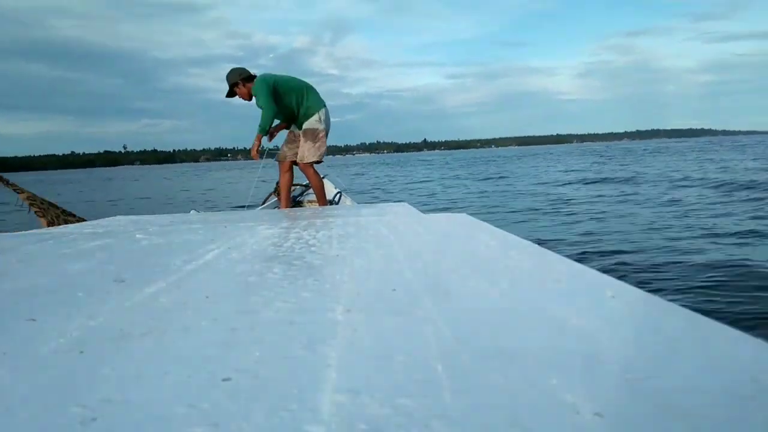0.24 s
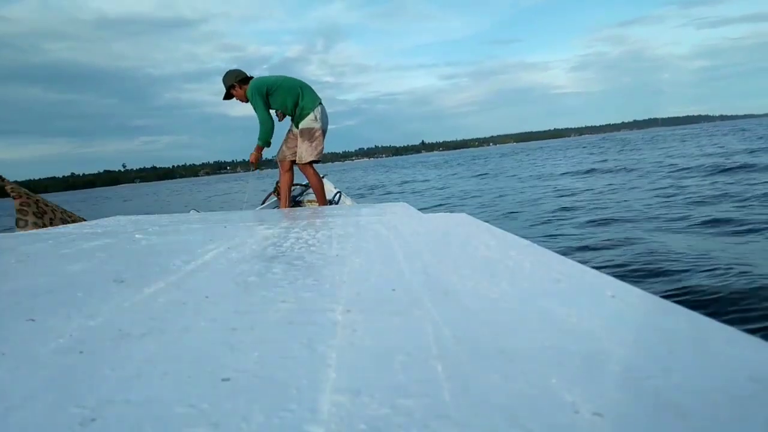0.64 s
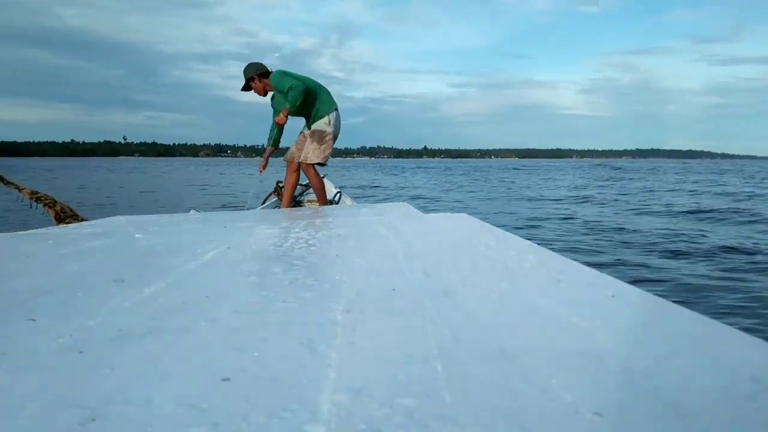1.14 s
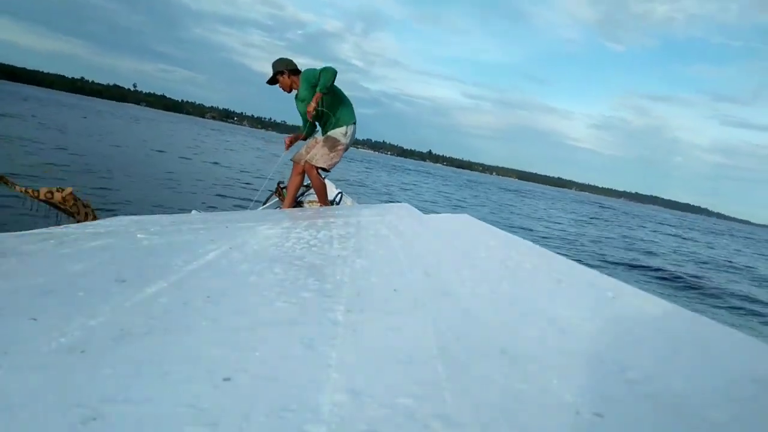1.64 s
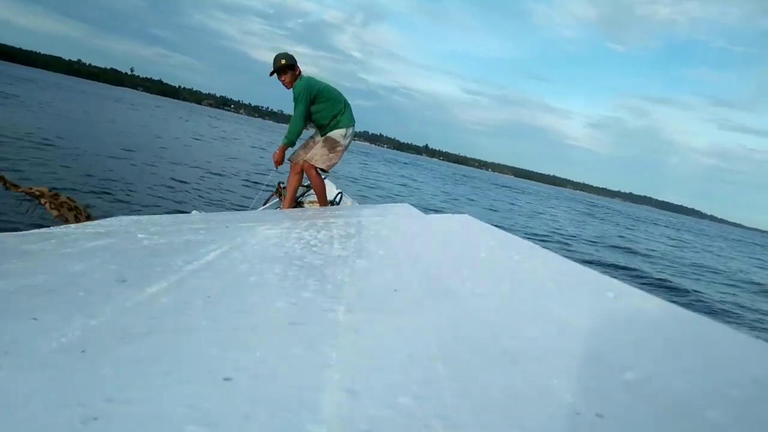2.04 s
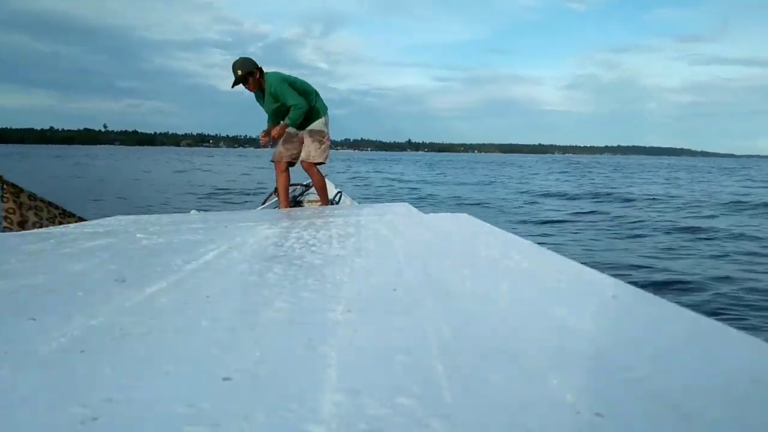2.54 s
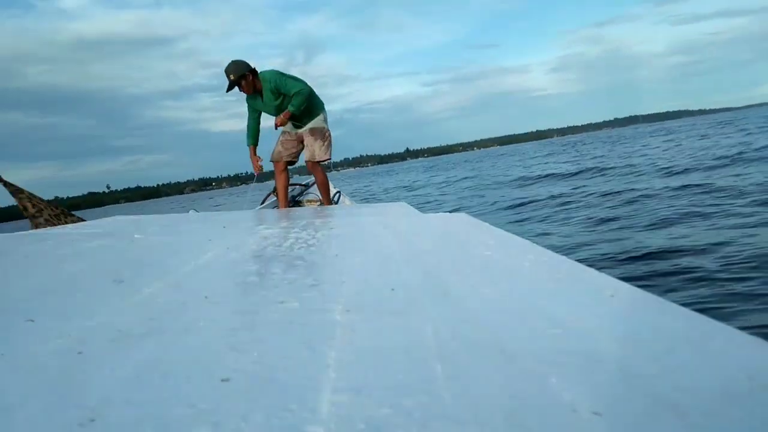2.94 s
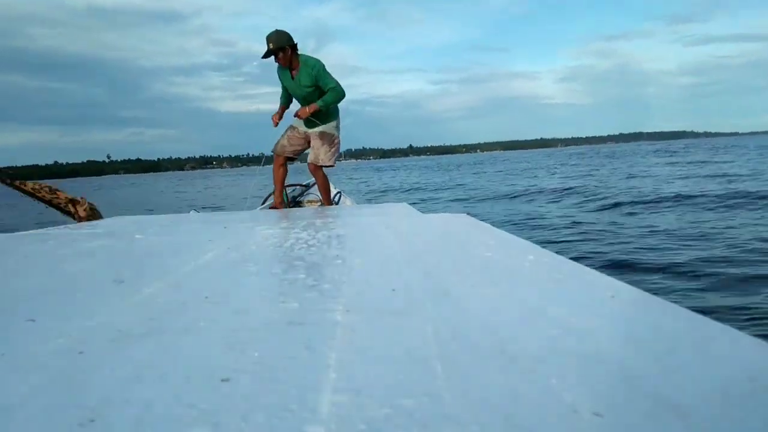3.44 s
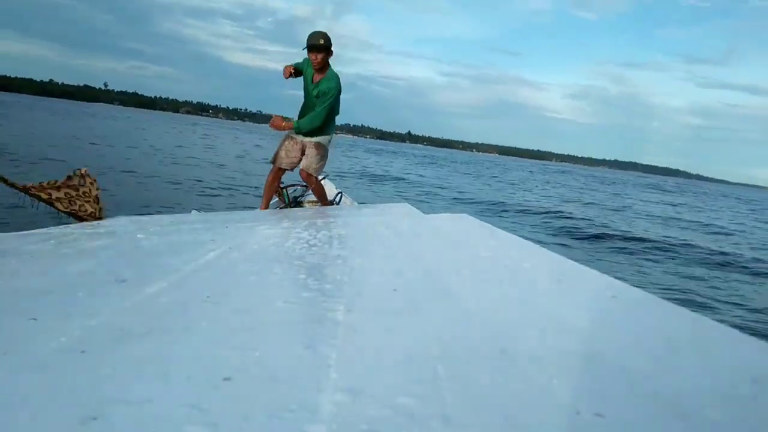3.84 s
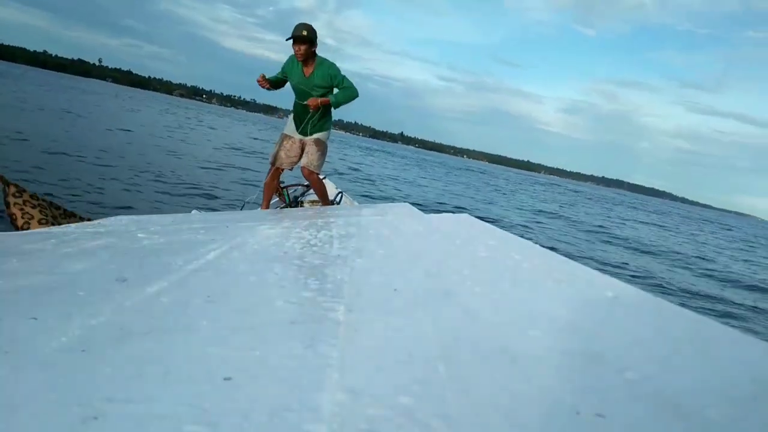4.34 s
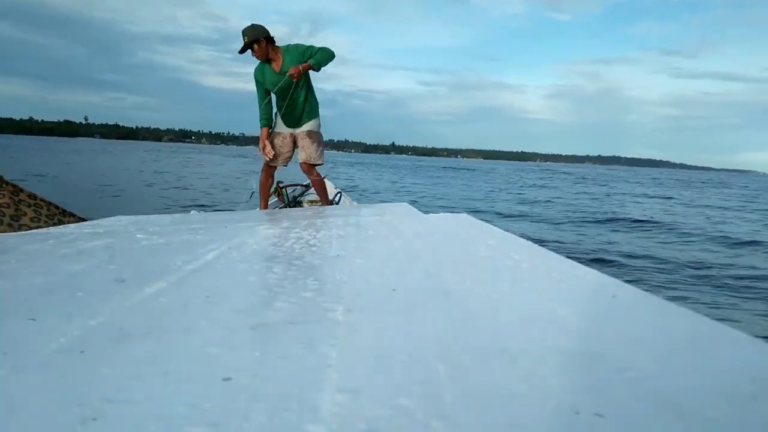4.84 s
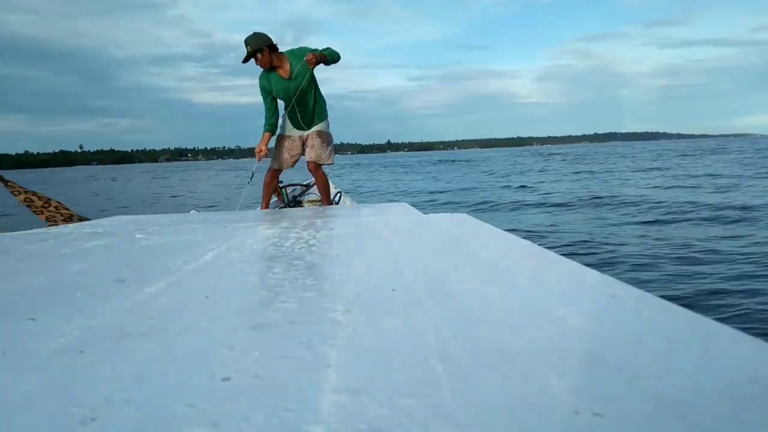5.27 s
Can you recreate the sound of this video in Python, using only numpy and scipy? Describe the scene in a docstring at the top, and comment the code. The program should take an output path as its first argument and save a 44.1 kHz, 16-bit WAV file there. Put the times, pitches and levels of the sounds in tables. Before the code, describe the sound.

Heard from the deck of a small boat on open water, uneven splashes gurgle against the hull over a low wind rumble. Small drips tick and a taut line rubs with a hiss as it is pulled in. Midway the line gives short, high squeaks and a rasping chatter, and the water grows busier, with sharp slaps, thuds and hollow gulps. The line squeaks once more near the end.

```python
"""Low, lumpy wind on the microphone and water sloshing along a hull: a small boat on open water, from on deck.
The sloshing is a rush of noise full of ringing bubbles. Short blips ring, drops tick, waves bump and slap
the boat, and air trapped under the hull gulps. A line is hauled in by hand: something taut hisses as it
rubs and, from about halfway, squeaks and chatters. One microphone picks it all up, through a bass cut
and a noise suppressor, over faint circuit hiss."""
import sys
import numpy as np
from scipy import signal
from scipy.io import wavfile
from scipy.ndimage import uniform_filter1d

SR = 44100
rng = np.random.default_rng(int(sys.argv[2]) if len(sys.argv) > 2 else 0)


def output_pcm(signal):
    """Save a mono or channel-first signal as 16-bit PCM at the path in sys.argv[1].

    Samples are clipped to [-1, 1] before scaling.
    """
    pcm = np.clip(np.atleast_2d(signal).T, -1, 1) * 32767
    wavfile.write(sys.argv[1], SR, np.round(pcm).astype(np.int16))


N = 242856


def gain_of(db):
    """Decibels to amplitude."""
    return 10 ** (np.asarray(db) / 20)


def unit_rms(x):
    """Scales to rms 1."""
    return x / np.sqrt(np.mean(x ** 2) + 1e-20)


def steadied(x, window_s):
    """Evens out drifts of level slower than window_s; rms 1."""
    return unit_rms(x / np.sqrt(uniform_filter1d(x ** 2, round(window_s * SR)) + 0.046))


def add(mix, start_s, sound):
    """Mixes a sound in at start_s."""
    part = mix[round(start_s * SR):][:len(sound)]
    part += sound[:len(part)]


def spectrum_db(points, hz):
    """Level of a spectrum at hz, interpolated over log frequency."""
    point_hz, db = np.transpose(points)
    return np.interp(np.log(hz + 1), np.log(point_hz + 1), db)


def resonate(x, hz, width_hz):
    """A resonance of gain 1 that can glide: shifts hz down to zero, smooths, and shifts back."""
    carrier = np.exp(2j * np.pi * np.cumsum(hz * np.ones(len(x))) / SR)
    pole = np.exp(-np.pi * width_hz / SR)
    return 2 * (carrier * signal.lfilter([1 - pole], [1, -pole], x / carrier)).real


def band_noise(length, hz, width_hz):
    """Noise passed twice through a resonance; rms 1."""
    return unit_rms(resonate(resonate(rng.standard_normal(length), hz, width_hz), hz, width_hz))


def noise(colour, patchy_db, flicker_db, size=512):
    """Coloured noise with drifting spectral patches and a flicker shared by all frequencies; rms 1."""
    frames, hz = 4 * N // size + 5, np.fft.rfftfreq(size, 1 / SR)
    real, imag, patches = rng.standard_normal((frames, len(hz), 3)).T
    patches = unit_rms(uniform_filter1d(uniform_filter1d(patches, size=3, axis=0), size=14, axis=1))
    flicker = unit_rms(uniform_filter1d(rng.standard_normal(frames), size=3))
    shape_db = spectrum_db([(0, -100)] + colour + [(SR / 2, -100)], hz)
    spectra = (real + 1j * imag) * gain_of(shape_db[:, None] + patchy_db * patches + flicker_db * flicker)
    return unit_rms(signal.istft(spectra, nperseg=size, noverlap=3 * size // 4)[1][:N])


def burst(hz, width_hz, t60, rise_s, tone=0.):
    """A dying puff of band noise with some pure tone in it; peak 1."""
    t = np.arange(round(.4 * SR)) / SR
    ring = band_noise(len(t), hz, width_hz) + tone * np.sin(2 * np.pi * hz * t)
    puff = ring * (1 - np.exp(-t / rise_s)) * gain_of(-60 * t / t60)
    return puff / abs(puff).max()


def wind_and_bumps(gurgle_gain):
    """Wind buffets the microphone; each wave bump adds rumble and a thud, and gurgles shake the hull."""
    # spectra of the rumble and of the thud under the hull: (frequency [Hz], relative density [dB])
    rumble_colour = [(25, -20.5), (42, -42), (56, 4), (80, -3), (110, -8.5), (150, -11), (190, -47),
                     (300, -59.5), (500, -72)]
    thud_colour = [(90, -18.5), (130, 5), (190, 7), (240, -3), (310, -3), (420, -13.5)]
    # wind on the microphone: (time [s], level [dB])
    wind_levels = [(0.0, -44.5), (0.31, -58), (0.75, -46), (1.13, -55), (1.64, -44.5), (2.57, -52),
                   (2.66, -50), (2.91, -50.5), (3.4, -46), (3.92, -45.5), (4.07, -36), (4.26, -46),
                   (5.27, -49.5), (5.5, -49)]
    # waves bumping the boat: (time [s], half length [s], rumble [dB], thud [dB])
    bumps = [(0.317, 0.041, -36, -77), (0.427, 0.036, -34, -73), (0.577, 0.064, -40, -83),
             (0.691, 0.13, -50, -73), (0.876, 0.052, -60, -45.5), (1.04, 0.01942, -56.5, -78.5),
             (1.555, 0.11, -44, -60.5), (1.846, 0.069, -40, -51), (2.01, 0.078, -39.5, -62.5),
             (2.174, 0.04686, -40.5, -58.5), (2.321, 0.065, -40.5, -47), (2.443, 0.0603, -41, -54),
             (2.585, 0.0769, -45, -36.5), (3.152, 0.0271, -45, -76), (3.25, 0.059, -36.5, -48),
             (3.448, 0.026, -51, -46), (3.577, .15, -42, -46.5), (3.951, 0.059, -32.5, -34.5),
             (4.109, 0.045, -34, -44.5), (4.178, 0.092, -52, -39), (4.443, 0.0544, -47, -45),
             (4.543, 0.02013, -35.5, -51), (4.812, 0.16, -69.5, -36), (5.089, 0.0333, -44, -40.5),
             (5.281, 0.029, -36.5, -38.5), (5.34, 0.045, -47, -43), (5.439, 0.039, -51, -40)]
    edge_db, shake_db = -15.5, -12.5  # a bump half a length from its top; thud relative to gurgle
    rumble = steadied(noise(rumble_colour, 3.56, 2.7, size=2048), 0.28)
    thud = steadied(noise(thud_colour, 3.0, 0.5, size=1024), 0.084)
    t = np.arange(N) / SR
    rumble_power = gain_of(np.interp(t, *np.transpose(wind_levels))) ** 2
    thud_power = (gain_of(shake_db) * gurgle_gain) ** 2
    for top_s, half_s, rumble_db, thud_db in bumps:
        lump_db = edge_db * ((t - top_s) / half_s) ** 2
        rumble_power += gain_of(rumble_db + lump_db) ** 2
        thud_power += gain_of(thud_db + lump_db) ** 2
    return np.sqrt(rumble_power) * rumble + np.sqrt(thud_power) * thud


def blips():
    """Short, narrow-band ringing blips and a few brief pitched ticks."""
    # blips: (time [s], peak [dB], pitch [Hz], width [Hz], t60 [s])
    rings = [(0.027, -44.5, 2876, 515, 0.58), (0.087, -56, 6860, 500, 0.151),
             (0.765, -43.5, 2270, 297.5, 0.1359), (1.412, -48, 1838, 199, 0.21),
             (1.555, -56.5, 2698, 151.1, 0.19), (2.115, -48.5, 1065, 395, 0.15),
             (2.745, -40.5, 660, 194, 0.1365), (2.85, -44.5, 2450, 888, 0.04),
             (2.922, -39.5, 1162, 404, 0.27), (2.961, -38, 1015, 295, 0.14), (2.98, -36, 920, 250, 0.093),
             (2.975, -38, 4140, 400, 0.0585), (2.531, -28, 2990, 500, 0.05967),
             (3.586, -37, 3520, 390, 0.037), (4.022, -24.5, 2560, 1283, 0.019),
             (5.173, -45.5, 1510, 250, 0.14)]
    out = np.zeros(N)
    for start_s, db, hz, width_hz, t60 in rings:
        add(out, start_s, gain_of(db) * burst(hz, width_hz, t60, rise_s=0.0084 * t60, tone=0.5652))
    return out


def swell_gains():
    """Swells of sloshing water and of rubbing hiss: a gain curve for each of five bands; powers add."""
    # swells: (start [s], rise [s], time to fall 20 dB at fall speed 1 [s],
    #          gurgle [dB], splash [dB], patter [dB], spray or rubbing hiss [dB], mist [dB])
    swells = [(0.029, 0.11669, 0.54, -60.5, -49.5, -53.5, -59, -95),
              (0.148, 0.12, 0.29, -50.5, -46.5, -49.5, -54, -95),
              (0.51, 0.00233, 0.8, -73.5, -79, -71.5, -60, -95),
              (0.576, 0.009316, 0.23, -58.5, -53.5, -51, -55, -83),
              (0.681, 0.001434, 0.8, -77, -71, -85, -61.5, -73.5),
              (.77, 0.04627, 0.32, -79, -54.5, -61, -59, -88),
              (0.814, 0.04168, .04, -34, -43.5, -45, -44, -64),
              (.86, 0.044, 0.27, -43, -57, -51.5, -50.5, -80),
              (.9, 0.13, 0.0996, -66, -46, -49, -54.5, -90),
              (1.04, 0.074, 0.15, -46.5, -45, -48.5, -52, -71.5),
              (1.14, 0.036, 0.0754, -48, -45, -63, -70, -100),
              (1.21, 0.041, 0.16, -57.5, -57, -62.5, -61.5, -95),
              (1.794, 0.028, 0.15, -56.5, -56, -50.5, -54, -99),
              (2.116, 0.012, 0.7, -59, -58.5, -63.5, -70, -100),
              (2.14, 0.092, 0.82, -51, -51, -49.5, -53, -76),
              (2.25, 0.12, 0.33, -43, -45.5, -51, -58.5, -84.5),
              (2.37, 0.18, 0.13, -39.5, -39.5, -42, -49, -67),
              (2.539, 0.031, 0.07, -32, -36, -43.5, -44, -65),
              (2.703, 0.0031, 0.1144, -52, -49.5, -62.5, -44.5, -66),
              (2.759, 0.1, 0.4, -75, -72, -61.5, -51.5, -77),
              (2.9, 0.02005, 0.46, -86, -54, -64.5, -61, -74), (2.95, 0.04, 0.2, -64.5, -55, -56, -51, -75),
              (3.048, .005, 0.2046, -51, -47.5, -49.5, -54, -71),
              (3.065, 0.0151, 0.2559, -57, -53.5, -52.5, -57, -87),
              (3.163, 0.009, 0.1, -41, -40, -37, -47.5, -63.5),
              (3.236, 0.02063, .06, -48, -61, -59, -65, -90.5),
              (3.294, 0.07776, 0.64, -53, -59, -55.5, -48.5, -72),
              (3.37, 0.064, 0.4501, -45, -47.5, -47, -52.5, -75),
              (3.43, 0.06386, 0.7, -59, -53, -52, -56, -77.5),
              (3.524, 0.024, 0.0668, -41.5, -39.5, -49.5, -40.5, -60),
              (3.56, 0.02561, 0.27, -43.5, -45, -56, -56, -73.5),
              (3.619, 0.07974, 0.1833, -44.5, -43, -46.5, -53, -72),
              (3.859, 0.011, .08, -46, -53, -63, -58.5, -99),
              (3.903, 0.00962, 0.11, -41.5, -42.5, -52.5, -46, -58.5),
              (3.979, 0.026, 1, -70, -60, -60.5, -60, -76),
              (4.136, 0.019, 0.0059, -36.5, -41.5, -55, -46, -89),
              (4.158, 0.022, 0.18, -41.5, -42.5, -42.5, -47, -72),
              (4.25, 0.031, 0.4, -50, -51.5, -62, -68.5, -93),
              (4.42, 0.026, 0.4125, -52.5, -67.5, -63.5, -63.5, -98),
              (4.396, .004, 0.1, -47.5, -53, -71, -63, -88.5),
              (4.528, 0.086, 0.61, -43, -42.5, -44, -45.5, -65),
              (4.619, 0.18683, 0.14, -38.5, -40, -44, -53, -72.5),
              (4.868, 0.024, 0.1944, -42, -43.5, -44.5, -47.5, -68),
              (5.053, .014, 0.05, -34.5, -37, -48.5, -47.5, -55.5),
              (5.099, 0.0056, 0.1302, -56, -54.5, -65.5, -59, -71),
              (5.16, .03, 1.5, -72, -66.5, -70, -68, -95), (2.62, 0.01768, .2, -63, -50, -58, -57.5, -90),
              (.44, 0.0086, .06, -57.5, -63, -67, -73, -89), (.028, 0.028, 0.0726, -70, -62, -57, -68, -95),
              (5.226, 0.0054, .14, -69, -60.5, -60, -49, -64),
              (5.309, 0.0091, 0.3, -59, -54, -54, -68, -75),
              (5.395, 0.026, .08, -46.5, -48, -53.5, -54.5, -65),
              (5.45, 0.026, 2.5, -57.5, -60, -58, -64, -78.5)]
    fall_speeds = (.9, 1.05, 1.4, 1.7, 2.2)  # gurgle to mist: higher bands die sooner
    power = np.zeros((5, N))
    for start_s, rise_s, fall_s, *levels_db in swells:
        t = np.arange(round((rise_s + 4 * fall_s) * SR)) / SR
        rise = np.minimum(t / rise_s, 1) ** 0.98925
        fall_db = 20 * (np.maximum(t - rise_s, 0) / fall_s) ** 1.102
        for band, db, speed in zip(power, levels_db, fall_speeds):
            add(band, start_s, (rise * gain_of(db - speed * fall_db)) ** 2)
    return np.sqrt(power)


def bubbles(low_hz, high_hz, per_s, cycles, spread_db):
    """Scattered bubbles of 16 sizes, each a short ring that rises in pitch; a few are loud."""
    strength = gain_of(spread_db * np.minimum(rng.exponential(1, N), 4))
    onsets = strength * (rng.random(N) < per_s / SR)
    size_class, out = rng.integers(0, 16, N), np.zeros(N)
    for k, hz in enumerate(np.geomspace(low_hz, high_hz, num=16)):
        turns = np.arange(round(3 * cycles * SR / hz)) * hz / SR
        ring = np.exp(-turns / cycles * 2) * np.sin(2 * np.pi * turns * (1 + 0.012 * turns))
        out += signal.oaconvolve(onsets * (size_class == k), ring)[:N]
    return unit_rms(out)


def hull_ring(x):
    """The hollow boat resonates to the water against it."""
    # hull modes: (frequency [Hz], width [Hz], relative gain [dB])
    modes = [(223, 9.7, 11), (371.21, 18, 4.5), (404, 16, 3.5), (622, 165, 7.5), (800, 720, -4),
             (946, 86, 2)]
    return unit_rms(sum(gain_of(db) * resonate(x, hz, width_hz) for hz, width_hz, db in modes))


def slosh(gains):
    """Four bands of rushing noise and bubbles; the lowest rings the hull, the top is also rubbing hiss."""
    # spectra of the four bands, low to high: (frequency [Hz], relative density [dB])
    gurgle_colour = [(200, -13), (300, -10), (400, 11), (700, 5), (1000, -23.5), (1600, -47)]
    splash_colour = [(500, -30), (780, 8), (1100, 4), (1800, 1.5), (2300, -16.5), (3500, -54)]
    patter_colour = [(1300, -17.5), (1900, 2), (2700, 0.5), (3600, -4), (4300, -6.5), (6000, -58)]
    hiss_colour = [(2800, -61), (3800, 9), (5000, 7), (6500, 5), (7500, 7), (8500, 4.5), (10000, -46)]
    gurgle = noise(gurgle_colour, 4.1, 1.86)
    gurgle += .85 * bubbles(314, 755.16, per_s=90, cycles=22.5, spread_db=4.5)
    gurgle = unit_rms(gurgle) + .7 * hull_ring(gurgle)
    splash = noise(splash_colour, 2.5, .7)
    splash += .45 * bubbles(800, 1800, per_s=400, cycles=10.5, spread_db=3)
    patter = noise(patter_colour, 2.5, 1.5)
    patter += .5 * bubbles(1900, 3400, per_s=300, cycles=9, spread_db=4.5)
    hiss = noise(hiss_colour, 2.5, 2.1, size=256)
    hiss += .45 * bubbles(3800, 7000, per_s=500, cycles=14, spread_db=4.5)
    return sum(gain * steadied(x, 0.19) for gain, x in zip(gains, (gurgle, splash, patter, hiss)))


def mist(gain):
    """The finest droplets: a faint top that crackles with the splashes."""
    # spectrum of the droplets: (frequency [Hz], relative density [dB])
    colour = [(7500, -14), (9000, 8.5), (10200, -4), (11500, -3), (13000, -18), (15500, -37)]
    return gain * steadied(noise(colour, patchy_db=3.5, flicker_db=2.5, size=256), 0.028)


def drops():
    """Fine drops strike with a treble tick."""
    # drop strikes: (time [s], peak [dB], pitch [Hz], t60 [s])
    ticks = [(0.2036, -37, 3920, 0.023), (0.5162, -38, 6360, 0.0115), (0.6875, -28, 4667, 0.02),
             (0.7061, -35, 6720, 0.012), (0.849, -30.5, 6250, 0.016), (0.8967, -32.5, 6900, 0.016),
             (0.9331, -37.5, 6837, 0.016), (1.0997, -37, 4390, 0.016), (1.2263, -39, 6561, 0.025),
             (1.6262, -59, 4540, 0.016), (1.8082, -41, 4016, 0.015), (1.919, -50.5, 4851, 0.024),
             (2.2741, -28, 5726, 0.0084), (2.4618, -34.5, 5954, 0.016), (2.482, -30, 3940, 0.016),
             (2.5024, -29, 3740, 0.0107), (2.5308, -25, 3870, 0.012), (2.555, -33, 6140, 0.014),
             (2.585, -34, 4000, 0.00713), (2.6479, -42, 3833, 0.016), (3.0525, -42.5, 4020, 0.0115),
             (3.5373, -31, 3816, 0.035), (3.8576, -43.5, 6220, 0.012), (3.911, -32, 6400, 0.012),
             (3.9384, -36.5, 3880, 0.042), (4.2355, -36.5, 4770, 0.014), (4.411, -65.5, 4448, 0.016),
             (4.7173, -32, 4231, 0.0118), (4.789, -31, 4000, 0.01284), (4.8944, -38, 3807, 0.016),
             (5.0589, -36.5, 4460, 0.01637), (5.1512, -43, 5950, 0.015), (5.2644, -36.5, 4286, 0.0195),
             (5.4426, -37, 5060, 0.019)]
    out = np.zeros(N)
    for start_s, db, hz, t60 in ticks:
        add(out, start_s, gain_of(db) * burst(hz, width_hz=2830, t60=t60, rise_s=0.00038, tone=0.97))
    return out


def slaps():
    """Water slaps the hull: a hollow knock plus a wide crack."""
    # slaps: (time [s], knock peak [dB], pitch [Hz], t60 [s], crack relative to knock [dB])
    impacts = [(0.589, -43.5, 636.6, 0.043, -21), (0.854, -54.5, 640, 0.0657, -8),
               (2.281, -24, 570, 0.06, -32), (2.529, -28, 880, 0.05, 5), (2.569, -51, 425, 0.025, -20.5),
               (3.169, -15.5, 1269, 0.032, 0.5), (3.245, -34.5, 433, 0.2784, -15),
               (3.41, -30, 618.7, 0.34, -32), (3.912, -29.5, 549, 0.165, -9),
               (4.144, -22.5, 890, 0.02673, -43), (4.398, -26.5, 600, 0.07044, -25),
               (4.7, -24, 567, 0.27, -10), (4.789, -23.5, 328, 0.0806, -19),
               (5.058, -47, 575, 0.0338, -3.5)]
    out = np.zeros(N)
    for start_s, db, hz, t60, crack_db in impacts:
        knock = burst(hz, width_hz=0.9788 * hz, t60=t60, rise_s=0.0006, tone=0.77)
        crack = burst(2500, width_hz=11000, t60=0.54 * t60, rise_s=0.00017)
        add(out, start_s, gain_of(db) * (knock + gain_of(crack_db) * crack))
    return out


def gulps():
    """Pockets of air trapped under the hull ring as single tones that slide for their first 0.1 s."""
    # air pockets: (time [s], level [dB], starting pitch [Hz], slide per 50 ms [ratio], t60 [s])
    pockets = [(.853, -29, 540, 1.03, 0.082), (2.561, -25.5, 424.5, 1, 0.19),
               (2.585, -25.5, 800, 0.87, 0.0987), (3.449, -33, 197, 0.75, 0.3),
               (3.92, -23.5, 259.6, 0.94, 0.1442), (3.948, -28, 197, 0.8822, 0.16),
               (4.106, -24, 129, 0.5, 0.046), (4.157, -29.5, 253.4, 0.82, 0.2),
               (4.41, -39.5, 237.2, 0.99, 0.28), (4.70, -28.5, 572.5, 1.03, 0.1766),
               (4.705, -27.5, 404, 0.966, 0.21), (4.801, -19, 356, 0.63, 0.099),
               (4.9, -39.5, 636, 1.296, 0.0778), (5.067, -31, 236, 1.0017, 0.35),
               (5.275, -36.5, 220, 0.76, 0.18), (5.3, -36, 347, 1, 0.072), (5.425, -35, 221.4, 1.28, 0.19)]
    out, t = np.zeros(N), np.arange(round(.3 * SR)) / SR
    for start_s, db, hz, slide, t60 in pockets:
        pitch_hz = hz * slide ** (np.minimum(t, .1) / .05)
        turns = np.cumsum(pitch_hz) / SR + rng.random()
        envelope = gain_of(db - 60 * t / t60) * (1 - np.exp(-t / 0.0069))
        add(out, start_s, envelope * np.sin(2 * np.pi * turns))
    return out


def squeaks():
    """Something taut rubs and squeaks: a rough gliding tone with a weaker overtone."""
    # one list a squeak: (time [s], level [dB], pitch [Hz], noise to tone [ratio], overtone pitch [ratio])
    rubs = [
        [(2.706, -37, 5110, .3, 1.45), (2.711, -35.5, 6160, 0.48, 1.45), (2.722, -43.5, 5970, 0.5285, 1.45),
         (2.733, -41, 5219, 0.678, 1.45), (2.748, -54, 3670, 0.407, 1.45)],
        [(3.008, -81.5, 5404, 0.32, 1.45), (3.016, -51, 4780, 0.57, 1.45), (3.024, -41, 4090, 0.356, 1.45)],
        [(5.23, -42.5, 2810, 0.476, 2.), (5.245, -44, 3050, 0.72, 2.), (5.27, -46, 3160, .9, 2.),
         (5.28, -55, 3020, 0.875, 2.)],
    ]
    out = np.zeros(N)
    for rows in rubs:
        times, *columns = np.transpose(rows)
        t = np.arange(times[0], times[-1], 1 / SR)
        db, pitch_hz, roughness, multiple = (np.interp(t, times, column) for column in columns)
        tone, overtone = (np.sin(2 * np.pi * np.cumsum(hz) / SR) + roughness * band_noise(len(t), hz, 480)
                          for hz in (pitch_hz, multiple * pitch_hz))
        add(out, times[0], gain_of(db) * (tone + 0.26 * overtone) * signal.windows.tukey(len(t), .15))
    return out


def chatter():
    """Runs of regular slips; in each slip the pitch drops from above, holds, and climbs as it dies."""
    # one list a run: (time [s], level [dB], held pitch [Hz], ringing share of a period [ratio],
    #                  upper partial [dB], rasp depth [ratio])
    runs = [
        [(2.77, -50, 3800, .85, -12, .5), (2.82, -47.5, 4100, .75, -7, .5), (2.87, -46, 4650, .6, -5, .5),
         (2.908, -43, 5200, .45, -7, .4)],
        [(2.919, -42, 5200, .33, -8, .3), (2.99, -43, 5100, .33, -8, .3)],
        [(3.2938, -36.5, 5030, .46, -15, .25), (3.42, -37, 4880, .42, -12, .35),
         (3.47, -39, 4720, .35, -12, .35), (3.53, -41, 4400, .4, -16, .4)],
    ]
    # pace of the slipping: (time [s], slips [1/s])
    slip_rates = [(2.77, 220), (2.87, 160), (2.908, 150), (2.919, 95), (2.99, 95), (3.29, 74.4),
                  (3.4, 73.7), (3.53, 73.7)]
    out = np.zeros(N)
    for rows in runs:
        times, *columns = np.transpose(rows)
        t = np.arange(times[0], times[-1], 1 / SR)
        rate = np.interp(t, *np.transpose(slip_rates))
        db, hz, share, upper_db, rasp = (np.interp(t, times, column) for column in columns)
        progress = np.minimum(np.cumsum(rate) / SR % 1 / share, 1)  # every slip starts its ring afresh
        cycles = hz * share / rate
        turns = cycles * (progress + .07 * (1 - np.exp(-progress / .11)) + .11 * progress ** 4.5)
        upper_turns = cycles * (1.3 * progress + .1 * progress ** 2)
        ring = np.sin(2 * np.pi * turns) + gain_of(upper_db) * np.sin(2 * np.pi * upper_turns)
        ramp = np.clip(np.minimum(progress / .1, (1 - progress) / .3), 0, 1)  # quick swell, slower fall
        envelope = gain_of(db) * np.sqrt(2) * np.sin(np.pi / 2 * ramp) ** 2
        uneven_grip = 1 + rasp * unit_rms(uniform_filter1d(rng.standard_normal(len(t)), size=40))
        add(out, times[0], envelope * ring * uneven_grip)
    return out


def deck_ring(x, t60=0.31, taps_per_s=3000):
    """Short diffuse ring of deck and hull around the microphone: sparse taps of random sign."""
    t = np.arange(round(.3 * SR)) / SR
    taps = rng.choice([-1., 1.], len(t)) * (rng.random(len(t)) < taps_per_s / SR)
    taps *= gain_of(-60 * t / t60) * (t > .003)
    return signal.oaconvolve(x, taps / np.linalg.norm(taps))[:N]


def suppress(x):
    """Noise suppressor: above 200 Hz, bands whose recent power is under the threshold are turned down."""
    # suppressor threshold: (frequency [Hz], level per bin [dB])
    threshold = [(300, -59.5), (1000, -70), (3000, -77), (6000, -80), (8500, -84), (15000, -105)]
    hz, _, spectra = signal.stft(x, SR, nperseg=512, noverlap=384)
    power = (abs(spectra[:, 1:]) ** 2).mean(0).reshape(64, 4, -1).mean(1)  # 64 bands of four bins
    power = uniform_filter1d(power, size=3, axis=1)
    held = np.maximum(power, signal.lfilter([.08], [1, -.92], power))  # opens at once, shuts slowly
    bin_power = np.vstack([held[:1], np.repeat(held, 4, axis=0)])
    excess = bin_power / gain_of(spectrum_db(threshold, hz))[:, None] ** 2
    gain = np.where(hz[:, None] < 200, 1, .03 + .97 * excess ** 3 / (1 + excess ** 3))
    return signal.istft(spectra * gain, SR, nperseg=512, noverlap=384)[1][:, :N]


def scene():
    """One microphone on deck, fed to both channels; the sounds close to it also ring the deck."""
    close = slaps() + drops() + blips() + squeaks() + chatter()
    band_gains = swell_gains()
    mix = close + gain_of(-15.5) * deck_ring(close) + gulps()
    mix += slosh(band_gains[:4]) + wind_and_bumps(band_gains[0])
    # steep treble roll-off on everything but the finest hiss
    dulled = signal.sosfilt(signal.butter(7, 7600, fs=SR, output="sos"), mix)
    return (dulled + mist(band_gains[4])) * gain_of([[.05], [-.05]])


def record(dry):
    """The chain behind the microphone: bass cut, suppressor, circuit hiss, band limit."""
    # spectrum of the circuit hiss: (frequency [Hz], relative density [dB])
    hiss_colour = [(250, -19), (500, 6.5), (1000, -4.5), (4000, -8), (8000, -13.5), (12000, -16.5),
                   (15500, -18.5)]
    bass_cut_hz, hiss_db, top_hz = 50, -78, 15500
    cut = signal.sosfilt(signal.butter(3, bass_cut_hz, "high", fs=SR, output="sos"), dry)
    mid_hiss, side_hiss = noise(hiss_colour, 0.87, 0.14), noise(hiss_colour, .6, .3)
    out = suppress(cut) + gain_of(hiss_db) * (mid_hiss + .06 * side_hiss * [[1], [-1]])
    band_limit = signal.firwin(511, top_hz, window=("kaiser", 9), fs=SR)
    return signal.oaconvolve(out, band_limit[None], "same")


dry = scene()
out = record(dry)
output_pcm(out)
```